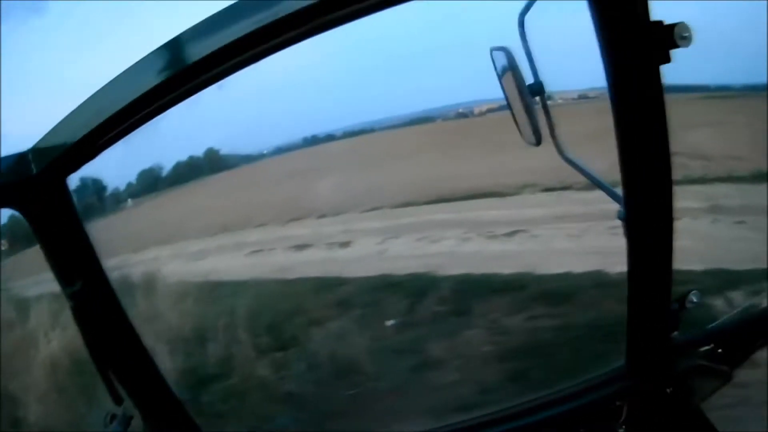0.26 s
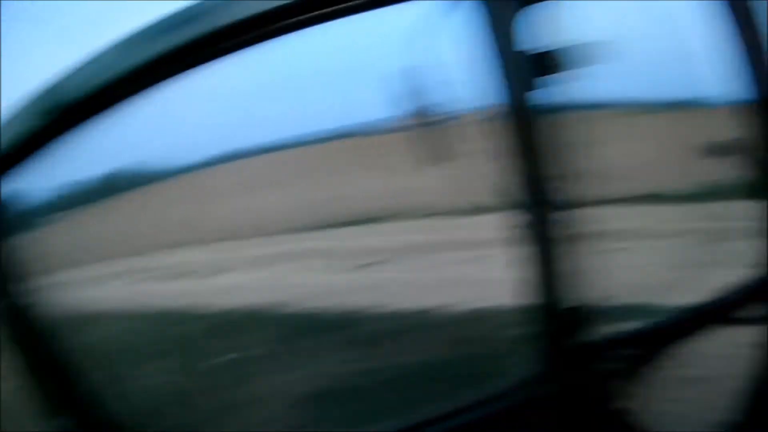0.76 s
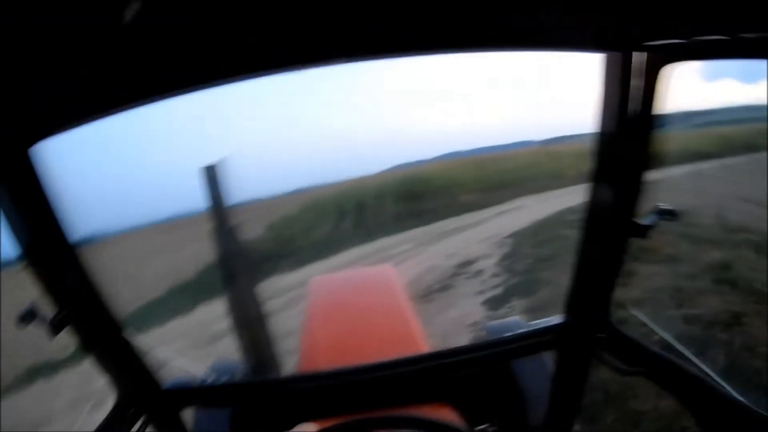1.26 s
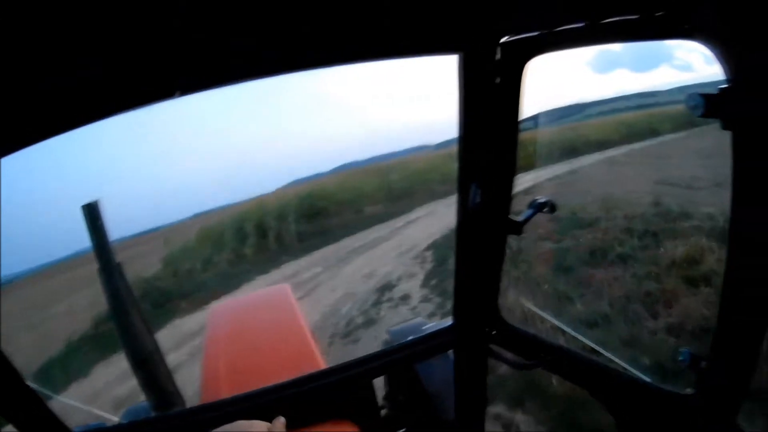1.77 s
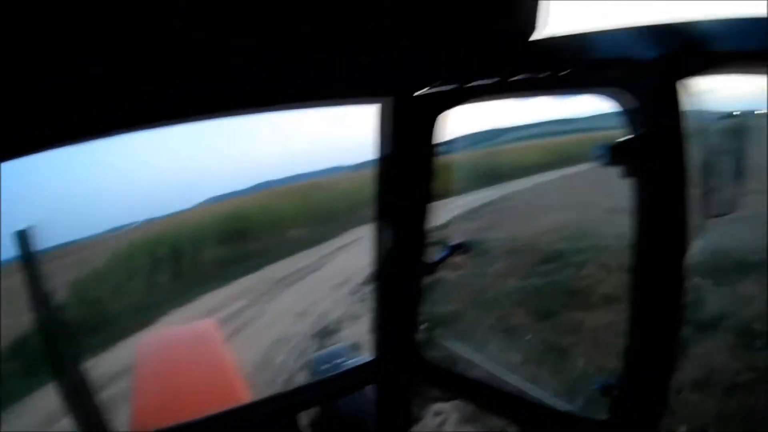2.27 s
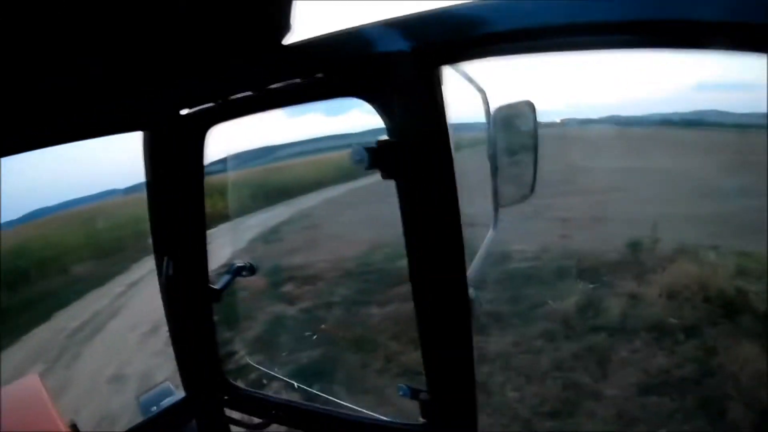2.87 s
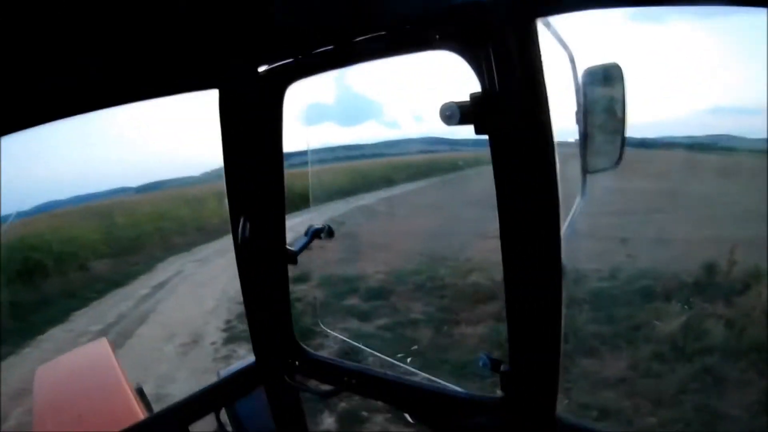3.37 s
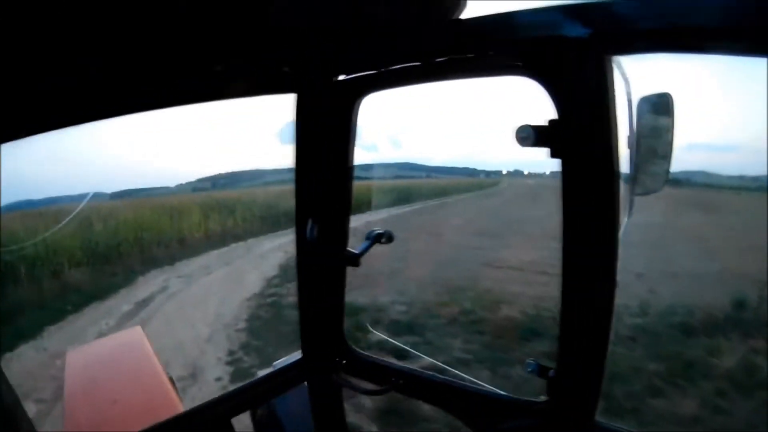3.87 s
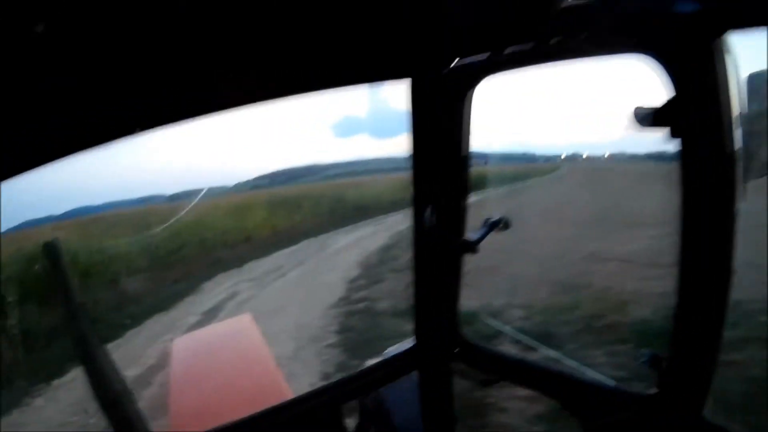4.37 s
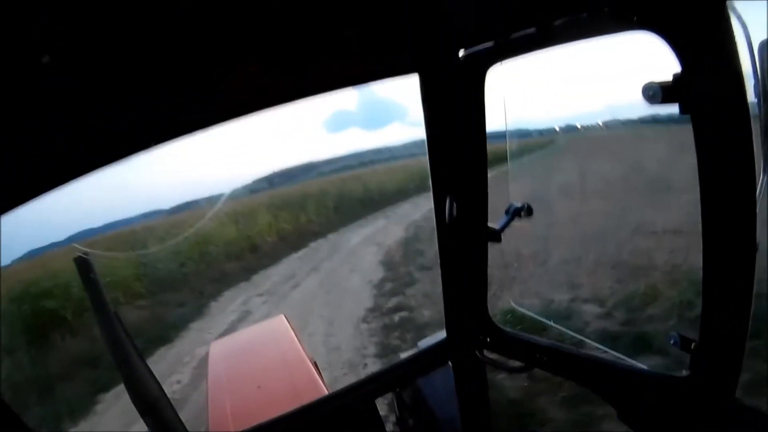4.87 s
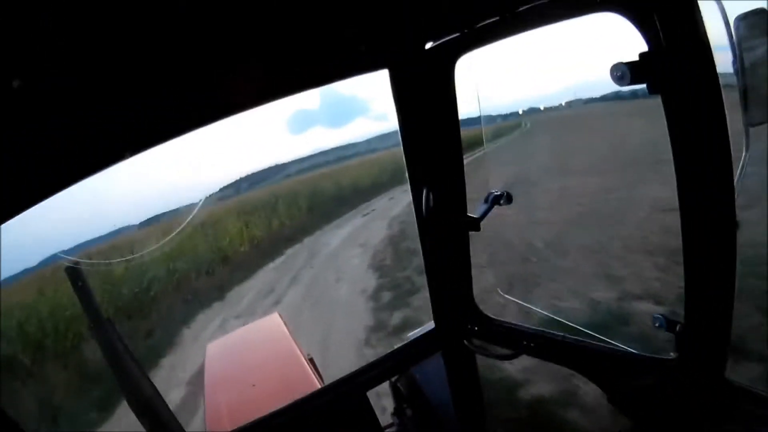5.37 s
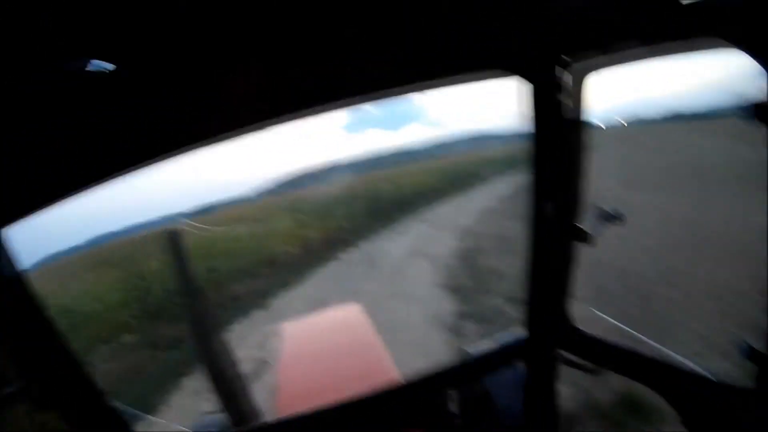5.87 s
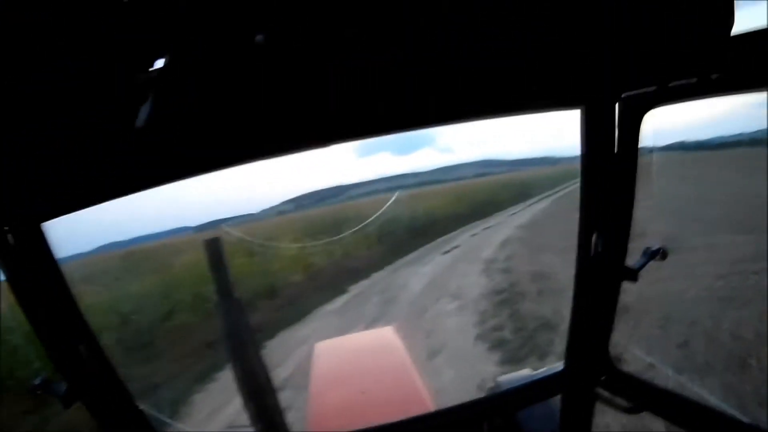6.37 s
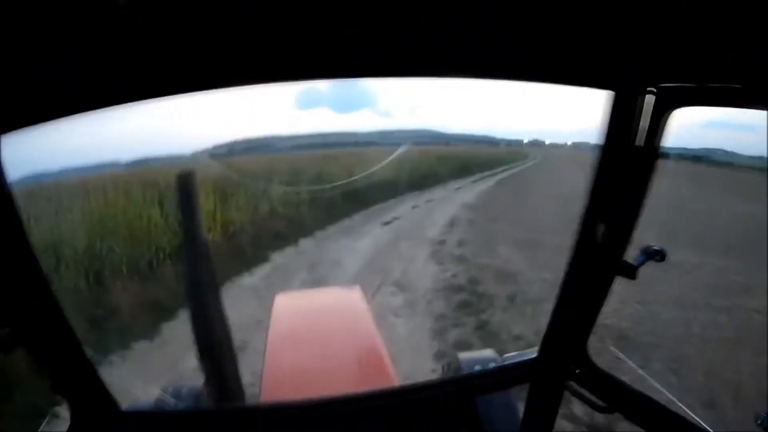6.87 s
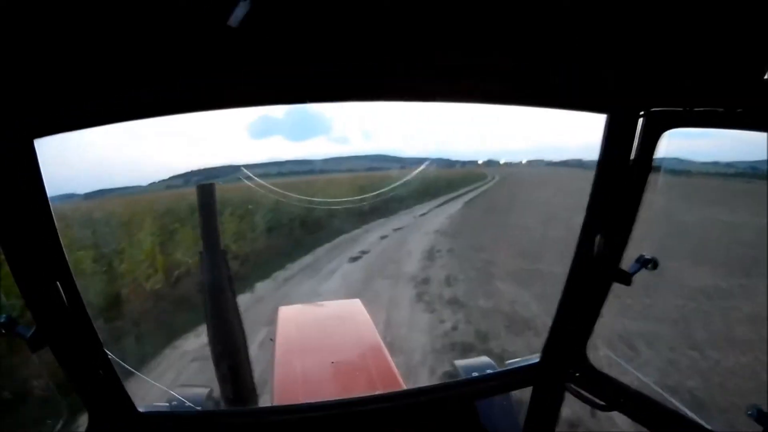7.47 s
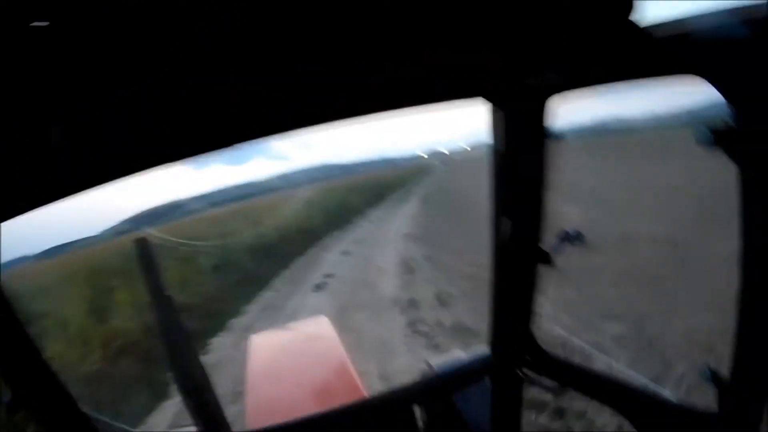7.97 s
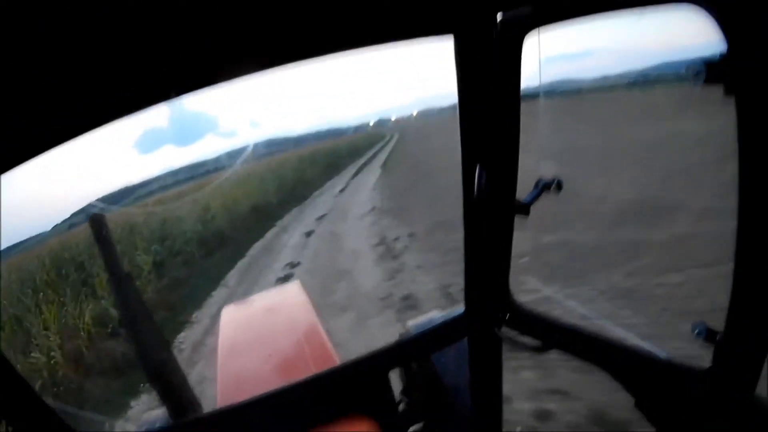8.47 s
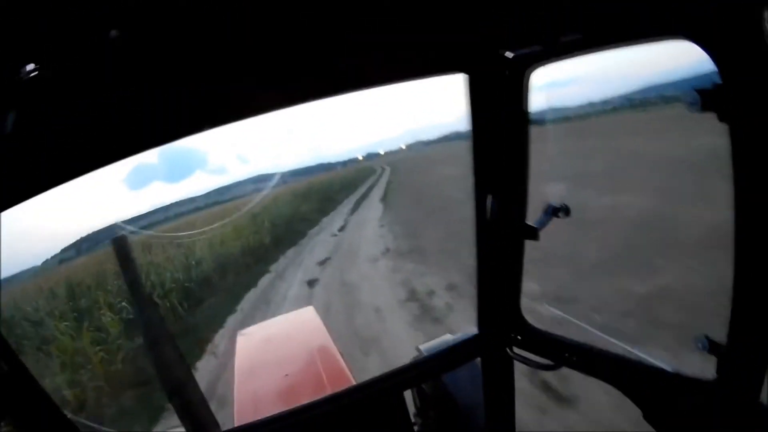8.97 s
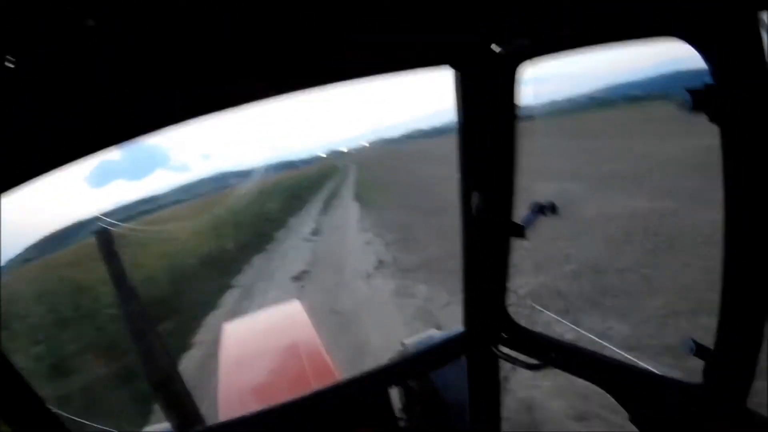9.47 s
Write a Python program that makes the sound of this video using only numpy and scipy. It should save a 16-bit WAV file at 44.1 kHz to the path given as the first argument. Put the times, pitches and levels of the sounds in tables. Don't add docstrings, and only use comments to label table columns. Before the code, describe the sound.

Inside a small closed tractor cab on a rutted dirt track, a three-cylinder diesel throbs with deep exhaust boom and hard metallic knock. Window glass and sheet metal rattle, gears whine thinly. Revs sag slightly, then climb strongly until about six and a half seconds, when load lifts, linkage clunks and revs fall. The clutch bites and the engine labours, then pulls up again. A hand-held microphone turns from left window to right, adding faint hiss.

```python
import sys
import numpy as np
from scipy import signal
from scipy.io import wavfile
from scipy.ndimage import uniform_filter1d

SR = 44100
rng = np.random.default_rng(int(sys.argv[2]) if len(sys.argv) > 2 else 0)


def linear_from_db(decibels):
    return 10 ** (np.asarray(decibels, float) / 20)


def waveform_to_disk(signal):
    frames = np.transpose(np.atleast_2d(signal))
    scaled = np.clip(frames, -1, 1) * 32767
    samples = np.round(scaled).astype(np.int16)
    wavfile.write(sys.argv[1], SR, samples)


N = 429529
TIME = np.arange(N) / SR


def evened(x):
    return x / np.sqrt(np.mean(x ** 2) + 1e-20)


def colour(x, points):
    f, db = np.transpose(points)
    hz = abs(np.fft.fftfreq(8192, 1 / SR))
    gain_db = np.interp(np.log(hz + 1), np.log(f + 1), db, left=-70, right=-70)
    log_gain = np.log(linear_from_db(gain_db))
    taps = np.fft.ifft(np.exp(np.conj(signal.hilbert(log_gain)))).real[:4096]
    return evened(signal.oaconvolve(x, taps)[:N])


def resonate(x, hz, width):
    r = np.exp(-np.pi * width / SR)
    return evened(signal.lfilter([1], [1, -2 * r * np.cos(2 * np.pi * hz / SR), r * r], x))


def ringing(drive, spectrum, modes):
    broad = colour(drive, spectrum)
    return evened(broad + sum(linear_from_db(db) * resonate(broad, hz, width) for hz, width, db in modes))


def drift(seconds):
    size = max(int(seconds * SR / 100), 2)
    coarse = rng.standard_normal(N // 100 + 2)
    smooth = evened(uniform_filter1d(uniform_filter1d(coarse, size), size))
    return np.interp(np.arange(N) / 100, np.arange(len(coarse)), smooth)


def bumps(x, rows):
    return sum(height * np.exp(-((x - at) / width) ** 2) for at, width, height in rows)


# time_s, speed_rpm
SPEED = [(0.0, 1181.0), (0.5, 1135.0), (1.365, 1089.9), (2.315, 1223.8), (2.895, 1194.7), (3.195, 1208.3),
         (4.145, 1186.1), (4.375, 1250.1), (4.565, 1253.0), (5.485, 1455.9), (6.165, 1679.2),
         (6.435, 1704.2), (7.125, 1411.8), (7.175, 1342.3), (7.985, 1083.5), (8.095, 1136.3),
         (8.795, 1249.4), (9.75, 1397.1)]
# time_s, load_db
LOAD = [(0.0, -2.2), (1.2, -0.4), (1.75, 2.8), (2.25, 2.9), (2.4, -0.5), (3.5, -4.1), (4.05, -3.4),
        (4.3, -0.1), (5.5, 1.2), (6.4, -2.3), (6.9, -3.5), (7.3, -6.4), (7.45, 0.9), (7.65, 3.2),
        (7.88, 1.9), (8.4, 3.2), (9.74, 1.7)]
# time_s, heading (-1 left window, 0 bonnet, 1 right window)
HEADING = [
    (0, -0.86),
    (.65, -0.7),
    (1.0, -0.25),
    (2.1, 0.063),
    (2.5, 1),
    (3.8, 0.52),
    (5.1, 0.67),
    (5.6, -0.26),
    (9.74, 0.054),
]


def along(rows):
    return np.interp(TIME, *np.transpose(rows))


RPM, LOAD_DB, TURN = along(SPEED), along(LOAD), along(HEADING)
LEFT, RIGHT = np.maximum(-TURN, 0), np.maximum(TURN, 0)
LIFT_S, BITE_S = 6.46, 7.378
PEDAL_S, GAP_S = .07, .06


def pedal(at_s):
    return np.clip((TIME - at_s) / PEDAL_S + .5, 0, 1)


LIFT, SLACK = pedal(LIFT_S), pedal(LIFT_S + PEDAL_S / 2)
HUSH, BITE = pedal(BITE_S - GAP_S), pedal(BITE_S)
PULLING, COASTING = 1 - LIFT + BITE, SLACK - HUSH
SWING_DB = 0.34 * LOAD_DB + 1.17 * (RPM - 1200) / 100 - 6.5 * (LIFT - (HUSH + BITE) / 2)


def levels(rules):
    return [db + share * SWING_DB + left_db * LEFT + right_db * RIGHT + off_db * (1 - PULLING)
            for db, share, left_db, right_db, off_db in rules]


# level_db, share of load, slope_db per 100 rpm, off_load_db, facing_left_db
PULSES = [(-29.6, 1.01, 5.1, 2.5, .1), (-7.2, 1.0, 0.01, -8.5, .1), (-13.2, .6, 1.7, -9.5, .3),
          (-12, .7, -1.8, -12, 5), (-24, .8, .5, -1.1, .1)]
# pitch_hz, level_db
AIR = [(28.0, -8.2), (42.0, -13.4), (62.0, -7.1), (85.0, -10.8), (105.0, -17.3), (140.0, 5.2),
       (175.0, -9.2), (205.0, 2.4)]
# pitch_hz, width_hz, level_db
HOLLOWS = [(38, 3, 2), (123.8, 12.3, -20.3), (145, 9.8, -19.6), (215.3, 8.6, -7.2)]
NULL_RPM, NULL_WIDTH_RPM = 1585, 50
SURGE_DB, SURGE_S = 7, 0.16


def boom(k):
    db, share, slope_db, off_db, left_db = PULSES[k - 1]
    hz = k * RPM / 40
    air_hz, air_db = np.transpose(AIR)
    cab_db = np.interp(np.log(hz), np.log(air_hz), air_db) + bumps(hz, HOLLOWS)
    surge_db = (k > 3) * SURGE_DB * np.exp(-((TIME - BITE_S - SURGE_S) / SURGE_S) ** 2)
    pulse_db = db + share * LOAD_DB + slope_db * (RPM - 1200) / 100 + left_db * LEFT
    sign = np.tanh((NULL_RPM - RPM) / NULL_WIDTH_RPM) if k == 3 else 1
    return sign * linear_from_db(pulse_db + cab_db + surge_db) * (PULLING + linear_from_db(off_db) * COASTING)


# multiple of the cycle rate, level_db re knock
MINOR = [(2, -21), (4, -36), (5, -22), (7, -15.5), (8, -30), (10, -16.5), (11, -32.5), (13, -16.5),
         (14, -23.5), (16, -27.5), (17, -24), (18, -11), (19, -22), (20, -14), (21, -13), (22, -20),
         (24, -16), (27, -19), (28, -28), (30, -21)]
# pitch_hz, level_db
CAB = [(20, -22), (100, 1), (160, 2), (185, -6), (208, 1), (235, -9), (280, -1), (330, -36), (450, 22)]
# level_db, share of knock swing, left_db, right_db, off_load_db
STANDING_RULE = (1.47, -0.65, -10.5, -2.4, -0.5)
ODD_TURN = .82


def uneven_pulses(cycle, knock_db):
    cab_hz, cab_db = np.transpose(CAB)
    standing_db = levels([STANDING_RULE])[0]
    out = 0
    for k, db in MINOR:
        in_cab_db = np.interp(k * RPM / 120, cab_hz, cab_db) + (k > 16) * standing_db
        gain = linear_from_db(db + knock_db + in_cab_db + 1.27 * drift(0.36))
        start = rng.random() if k > 16 else -k * ODD_TURN
        out = out + gain * np.cos(2 * np.pi * (k * cycle + start) + .2 * drift(.3))
    return out


PULSE_TURN = .073


def exhaust(cycle, knock_db):
    angle = 2 * np.pi * (cycle - PULSE_TURN)
    turned = np.pi * np.array([
        1.1 * (SLACK - BITE) + (1 - SLACK + BITE) * np.clip((1620 - RPM) / 650, -.1, .4),
        0 * RPM - .07,
        np.clip((RPM - 1100) / 500, 0, .4),
        np.clip((1260 - RPM) / 100, -.4, .4),
        .3 + .7 * np.clip((1200 - RPM) / 40, 0, 1) - .8 * COASTING])
    out = uneven_pulses(cycle, knock_db)
    for k in range(1, 6):
        out = out - boom(k) * linear_from_db(0.3 * drift(0.051)) * np.cos(3 * k * angle + turned[k - 1])
    return np.sqrt(2) * out


# level_db, share of knock swing, left_db, right_db, off_load_db
CYLINDER_RULES = [(1.1, .1, -0.3, -3.5, -2.5), (2.5, -0.062, 0.9, -3, -7), (3, 0.062, -4, 1, -2.5)]
# centre_s, half_length_s, level_db
HARD_PULL = [
    (4.7, .35, 2.5),
]


def cylinders(index):
    return np.choose(index % 3, levels(CYLINDER_RULES)) + (index % 3 == 2) * bumps(TIME, HARD_PULL)


def firings(cycle, lag, decay, echo_db, spread_db):
    count = 3 * (cycle - lag)
    index, phase = np.floor(count).astype(int) + 3, count % 1
    strength_db = cylinders(index) + spread_db * rng.standard_normal(400)[index]
    shape = phase / decay * np.exp(1 - phase / decay)
    late = np.maximum(phase - .45, 0) / decay
    return linear_from_db(strength_db) * shape + linear_from_db(echo_db) * late * np.exp(1 - late)


def blows(cycle, spread_db):
    index = np.floor(3 * (cycle - .022)).astype(int) + 3
    strength_db = 2 * cylinders(index) + spread_db * rng.standard_normal(400)[index]
    clicks = (np.diff(index, prepend=index[0]) > 0) * linear_from_db(strength_db)
    t = TIME[:900]
    swell = (t / .0045) ** 2 * np.exp(-2 * t / .0045)
    ring = np.sin(2 * np.pi * (1480 * t + 9000 * t ** 2))
    return evened(signal.oaconvolve(clicks, swell * ring)[:N])


# pitch_hz, level_db per Hz
BLOCK = [(470, -29.5), (800, -15.5), (890, -9), (966, -10.5), (1060, -1.5), (1170, -3), (1300, -2),
         (1500, 1), (1700, -10), (1790, 6), (2700, -22.5), (3510, -39), (5940, -120)]
# pitch_hz, width_hz, level_db
BLOCK_MODES = [(1025, 210, -13.5), (1345, 43, -7.5), (1464, 11.3, -11), (1557, 140, -4.5), (1725, 29, -6.5),
               (2065, 140, -18.5)]


def block_knock(cycle):
    drive = rng.standard_normal(N) * (.72 + .6 * firings(cycle, .02, .15, -3, .7))
    return evened(ringing(drive, BLOCK, BLOCK_MODES) + linear_from_db(-6) * blows(cycle, .9))


# pitch_hz, level_db per Hz
PANELS = [(1410, 0), (2400, -13), (2530, 3), (2950, -7.5), (3230, 0), (3420, 2.5), (3700, -13.5),
          (4000, -6), (4270, 1), (5420, -20), (6050, -21), (6560, -20), (7500, -32), (9750, -56),
          (16500, -120)]
# pitch_hz, width_hz, level_db
PANEL_MODES = [(3100, 32, -14), (3340, 40, -17.5), (3970, 40, -17.5), (4140, 92, -15.5), (2493, 31, -8.5)]
# centre_s, half_length_s, glass_db, sheet_db
RUTS = [
    (.75, .2, 2, 0),
    (1.9, 0.22, 1.5, 1.5),
    (3.5, 0.6, -1.5, 4),
    (4.7, 0.64, 2.5, -0.5),
    (5.596, 0.27, 1, 1),
    (7.9, .3, 2, 3),
    (8.5, 0.33, 2.2, 0),
]


def panel_rattle(cycle, glass_db, sheet_db):
    glass_shake = linear_from_db(.8 * drift(0.16)) * (1.7 + firings(cycle, 0.012, 0.092, -7, 2.5))
    sheet_shake = linear_from_db(.7 * drift(0.17)) * (1.5 + firings(cycle, 0.025, 0.09, -13, 2.8))
    glass = ringing(rng.standard_normal(N) * glass_shake, PANELS, PANEL_MODES)
    sheet = ringing(rng.standard_normal(N) * sheet_shake, PANELS, PANEL_MODES)
    glass = evened(signal.sosfilt(signal.butter(6, 3700, fs=SR, output="sos"), glass))
    sheet = evened(signal.sosfilt(signal.butter(6, 3700, "high", fs=SR, output="sos"), sheet))
    glass_db = glass_db + bumps(TIME, np.array(RUTS)[:, :3])
    sheet_db = sheet_db + bumps(TIME, np.delete(RUTS, 2, axis=1))
    return linear_from_db(glass_db) * glass + linear_from_db(sheet_db) * sheet


# pitch_hz, level_db per Hz
BODY = [(130, -38.5), (220, -4.5), (237, -8.5), (280, -8), (328, -5), (486, -4), (766, -8), (1000, -5.5),
        (1300, -39.5), (2200, -120)]
# level_db, share of knock swing, left_db, right_db, off_load_db
RATTLES = [(-23.5, 0.18, -2, -3, 2.5), (-27, -0.027, -1.5, -2.5, 2.5), (-8, -0.084, -1, -3.5, -0.1)]


def clatter(cycle, knock_db):
    glass_db, sheet_db, body_db = levels(RATTLES)
    body_drive = rng.standard_normal(N) * (1.5 + firings(cycle, -0.013, 0.11, -20.5, 1.2))
    body = linear_from_db(body_db) * colour(body_drive, BODY)
    return linear_from_db(knock_db) * (block_knock(cycle) + panel_rattle(cycle, glass_db, sheet_db) + body)


# pitch_hz, width_hz, level_db re knock
SIDE_WINDOW = [(1448, 46, 0), (3920, 160, -30.5), (903, 17, -13.5)]


def side_window(cycle, knock_db):
    drive = rng.standard_normal(N) * (.22 + firings(cycle, .02, .13, -8, 1.5))
    return LEFT * sum(linear_from_db(knock_db + db) * resonate(resonate(drive, hz, 2 * width), hz, width)
                      for hz, width, db in SIDE_WINDOW)


GEAR_ORDERS = [26, 31.2, 45.5, 52]
# level_db, share of knock swing, left_db, right_db, off_load_db
WHINE_RULES = [(-53, 0.99, 2, -9, -30), (-55, -1.2, 2, -8, -12), (-52, .1, 10.5, 0, -9),
               (-50.5, -.3, -8, 3.7, -11)]
# pitch_hz, width_hz, level_db
CASING = [(293.7, 13, 13), (486.7, 32, 11.5)]


def gears(cycle):
    out = 0
    for k, db in zip(GEAR_ORDERS, levels(WHINE_RULES)):
        gain = linear_from_db(db + bumps(k * RPM / 120, CASING) + 2.7 * drift(0.091))
        out = out + np.sqrt(2) * gain * np.cos(2 * np.pi * k * cycle + 0.89 * drift(0.21))
    return out


# start_s, peak_db, pitch_hz, width_hz, t60_s
CLUNKS = [
    (6.572, -17.5, 1000, 300, 0.11),
    (6.576, -16.5, 1620, 600, 0.072),
    (6.573, -11.5, 205, 50, 0.092),
    (6.838, -21, 1620, 500, 0.16),
    (6.951, -29, 3800, 2500, 0.025),
    (7.287, -18, 1510, 248, 0.099),
    (7.333, -15, 1480, 347, 0.15),
    (8.628, -32.5, 3700, 1800, 0.14),
]


def gear_shift():
    out, t = np.zeros(N), TIME[:SR // 4]
    for s, db, hz, width, t60 in CLUNKS:
        ring = resonate(resonate(rng.standard_normal(len(t)), hz, width), hz, width)
        out[round(s * SR):][:len(t)] += linear_from_db(db - 60 * t / t60) * np.minimum(t / 0.004, 1) * ring
    return out


# centre_s, peak_db, pitch_hz, half_length_s
THUMPS = [
    (6.634, -31, 33, 0.048),
    (6.889, -11, 33.6, 0.033),
]
# centre_s, peak_db, pitch_hz, half_length_s
SQUEAKS = [(1.6, -44, 3340, 0.027), (2.15, -38, 3400, 0.01), (2.154, -37, 3100, 0.011),
           (4.406, -42, 3330, .01), (4.472, -37, 3300, 0.01), (4.507, -43, 3340, .015),
           (4.565, -44, 3300, .011), (4.62, -40, 3300, .008), (4.655, -43, 3060, .01),
           (4.728, -41, 3330, .014), (4.944, -44, 3340, 0.022), (7.465, -36, 3320, 0.0088),
           (7.635, -40, 3380, .015), (7.656, -41, 3950, .03), (7.663, -38, 3100, 0.017),
           (7.975, -40.5, 3970, 0.008), (8.085, -40, 3970, 0.01), (8.089, -39, 3450, 0.0092)]


def jolts_and_squeaks():
    out, t = np.zeros(N), TIME[:SR // 4]
    since = t - t[-1] / 2
    for s, db, hz, half in THUMPS + SQUEAKS:
        tone = np.exp(-(since / half) ** 2) * np.cos(2 * np.pi * hz * (since + 0.0036))
        out[round((s - t[-1] / 2) * SR):][:len(t)] += linear_from_db(db) * tone
    return out


# pitch_hz, level_db per Hz
RUMBLE = [(12, -20), (25, -5), (40, 0), (100, -11), (200, -13), (280, -10), (330, -22), (400, -32)]


def road_rumble():
    return linear_from_db(-34.5 + 1.5 * drift(.25)) * colour(rng.standard_normal(N), RUMBLE)


# pitch_hz, level_db per Hz
HISS = [(2940, -23), (5000, -1), (6090, -5.5), (6640, -5), (8000, -7), (9750, -5), (11400, -8), (15800, -3)]
# pitch_hz, width_hz, level_db
CHIRP_BANDS = [(6480, 330, -59.5), (9840, 300, -60)]
# pitch_hz, level_db
TONES = [(12331, -84), (12408, -75), (12484, -75), (12561, -85)]


def camera():
    late, size, length = rng.random((200, 3)).T
    starts = .012 + .05 * np.arange(200) + .01 * np.floor(3 * late ** 2)
    gate = np.zeros(N)
    for s, db, half in zip(starts, 3 * size, .004 + .003 * length):
        near = slice(max(int((s - .03) * SR), 0), int((s + .03) * SR))
        gate[near] += linear_from_db(db) * np.exp(-((TIME[near] - s) / half) ** 2)
    chirps = sum(linear_from_db(db) * gate * resonate(resonate(rng.standard_normal(N), hz, width), hz, width)
                 for hz, width, db in CHIRP_BANDS)
    tones = sum(linear_from_db(db) * np.sqrt(2) * np.sin(2 * np.pi * hz * TIME) for hz, db in TONES)
    return linear_from_db(-56.5) * colour(rng.standard_normal(N), HISS) + chirps + tones


def scene():
    cycle = .055 + np.cumsum(RPM) / SR / 120
    knock_cycle = cycle + .004 * (RPM - 1000) / 100
    knock_db = -22.5 + SWING_DB + 0.7 * LEFT
    knock_db = knock_db + BITE * 2.5 * np.exp(-np.maximum(TIME - BITE_S, 0) / 0.09)
    engine = exhaust(cycle, knock_db) + clatter(knock_cycle, knock_db) + gears(cycle)
    cab = side_window(cycle, knock_db) + gear_shift() + jolts_and_squeaks()
    return (engine + cab + road_rumble())[None]


def top_cut(x):
    return signal.sosfilt(signal.butter(12, 15900, fs=SR, output="sos"), x)


def record(dry):
    rounded = dry / (1 + abs(dry / 1.15) ** 6) ** (1 / 6)
    return top_cut(1.009 * rounded + camera())


dry = scene()
out = record(dry)
waveform_to_disk(out)
```